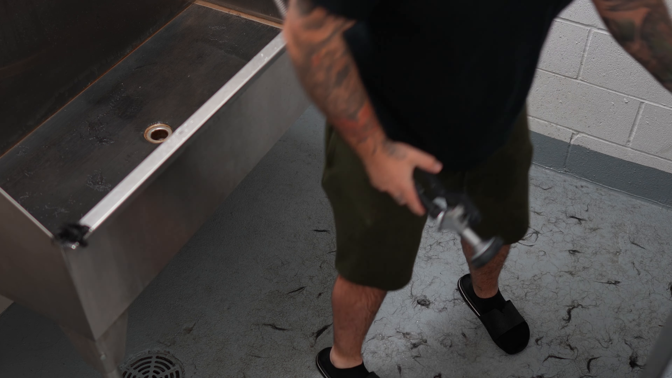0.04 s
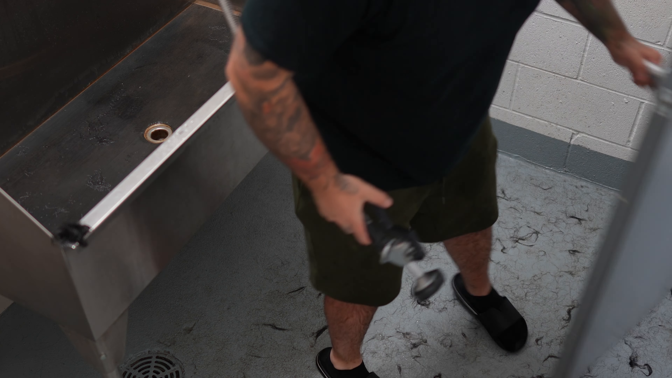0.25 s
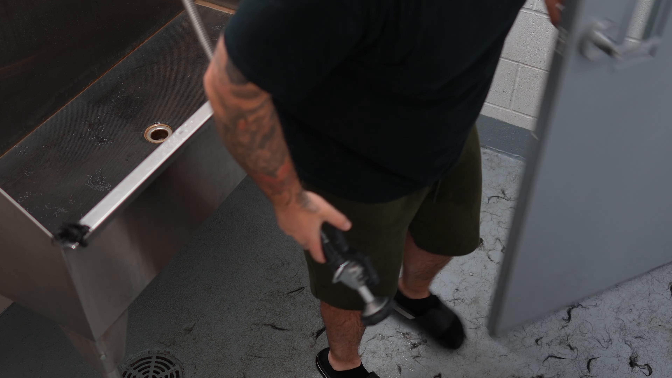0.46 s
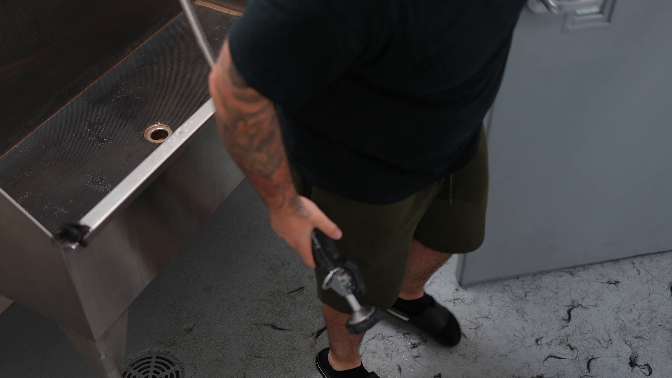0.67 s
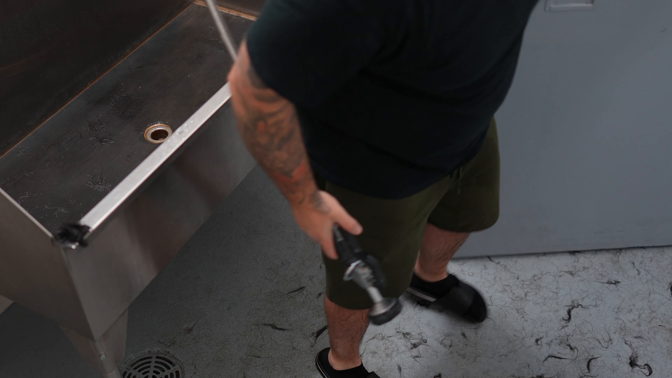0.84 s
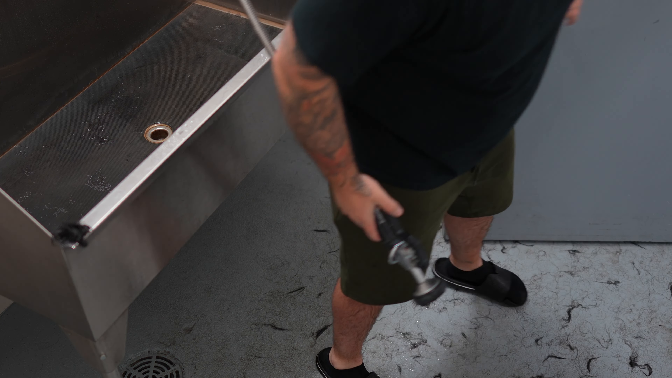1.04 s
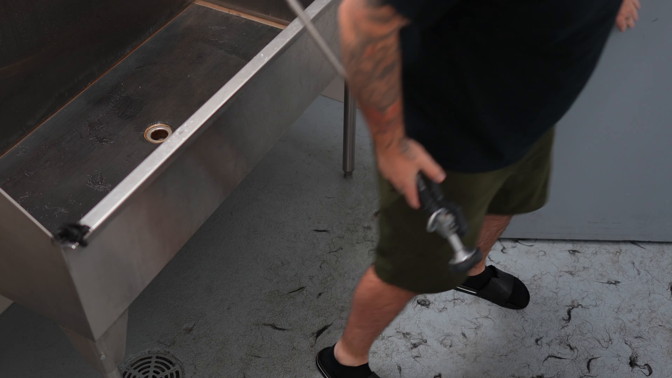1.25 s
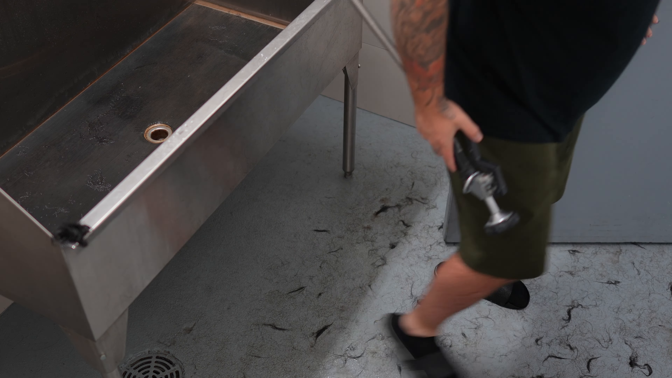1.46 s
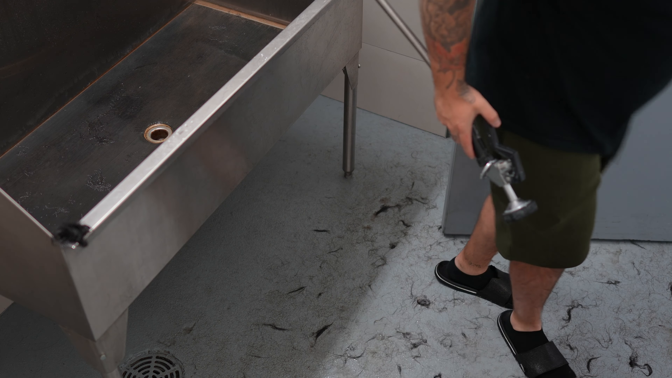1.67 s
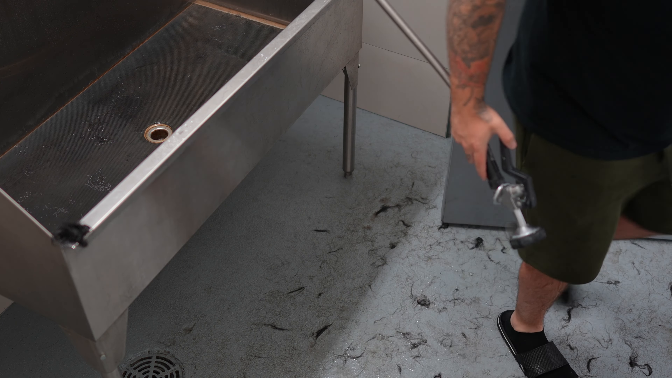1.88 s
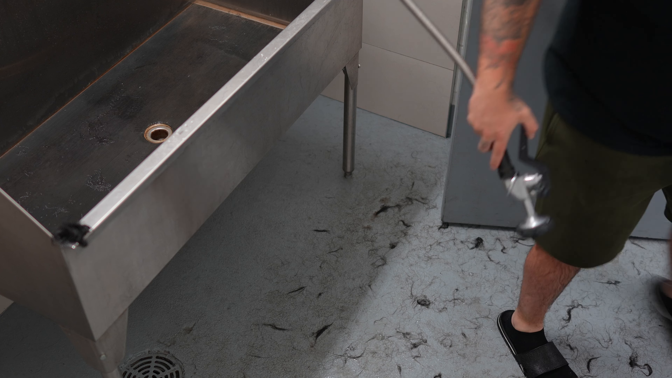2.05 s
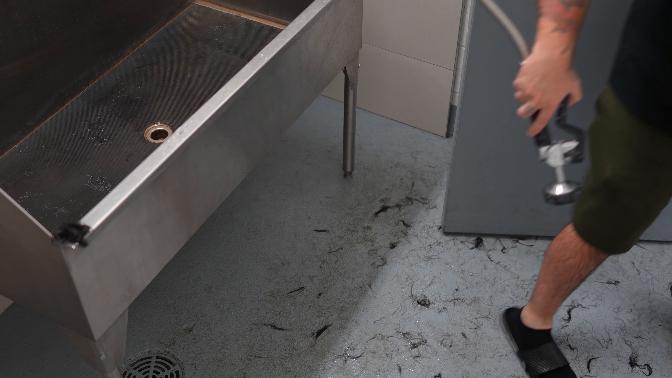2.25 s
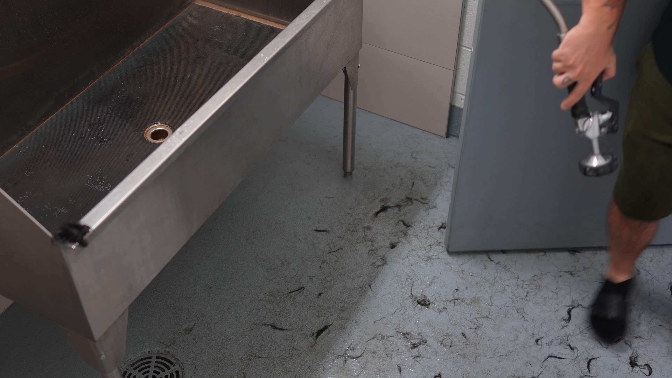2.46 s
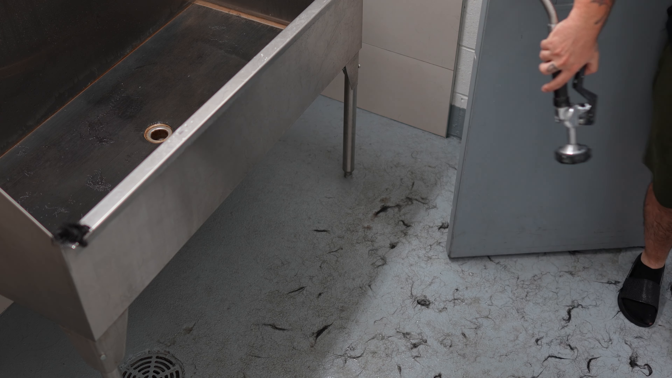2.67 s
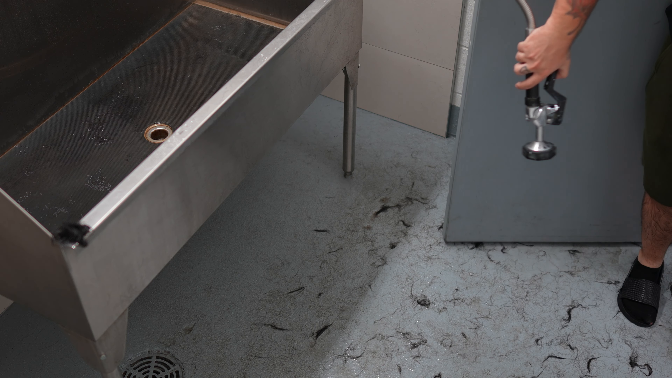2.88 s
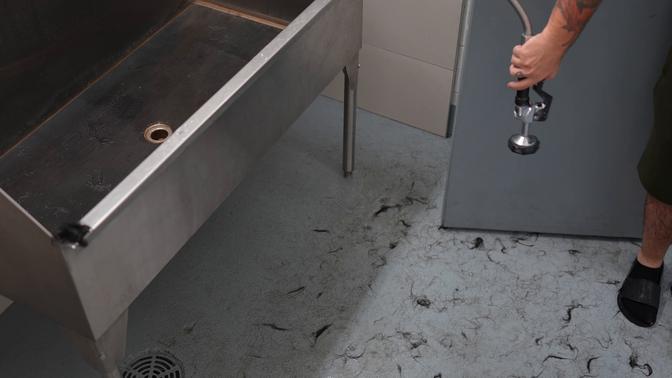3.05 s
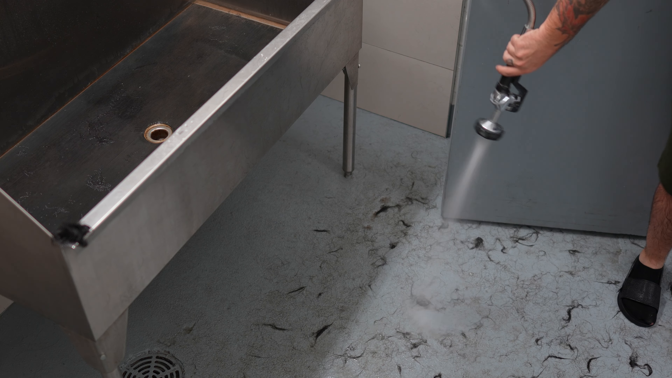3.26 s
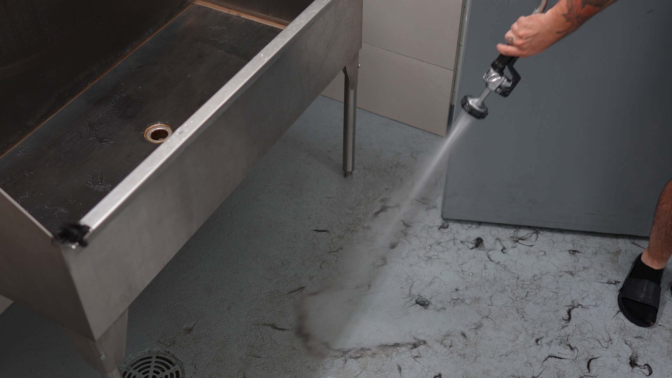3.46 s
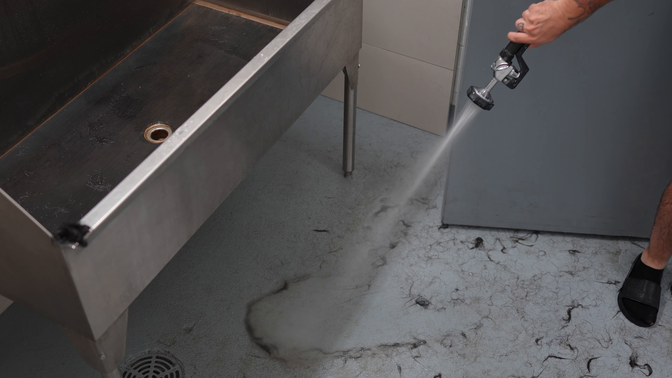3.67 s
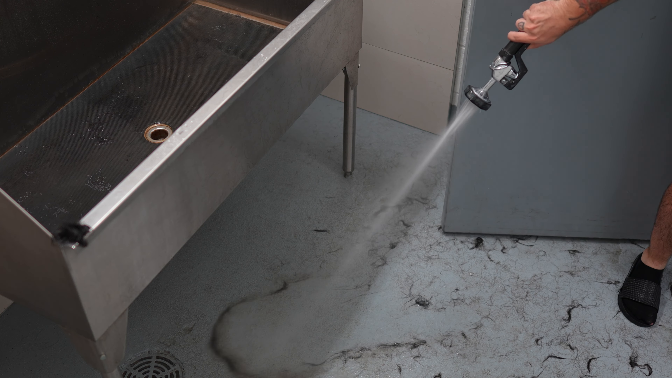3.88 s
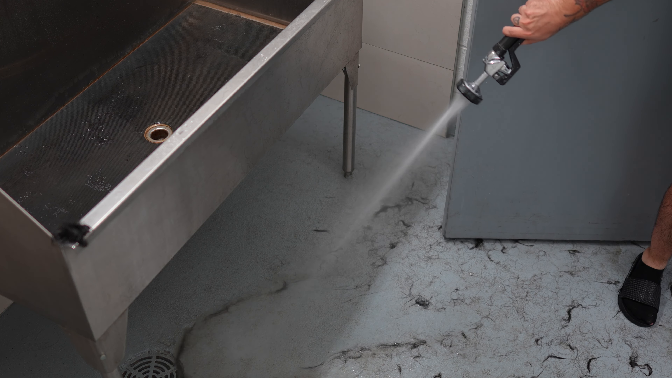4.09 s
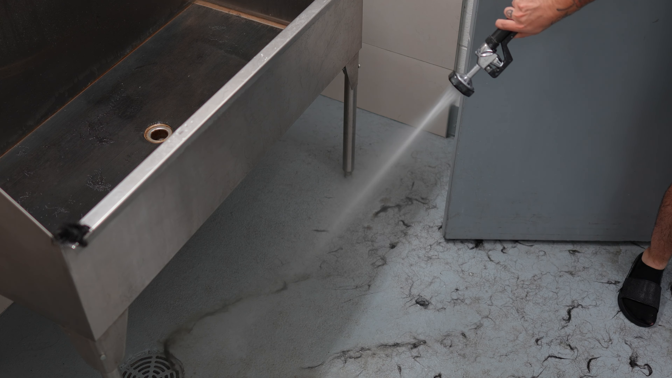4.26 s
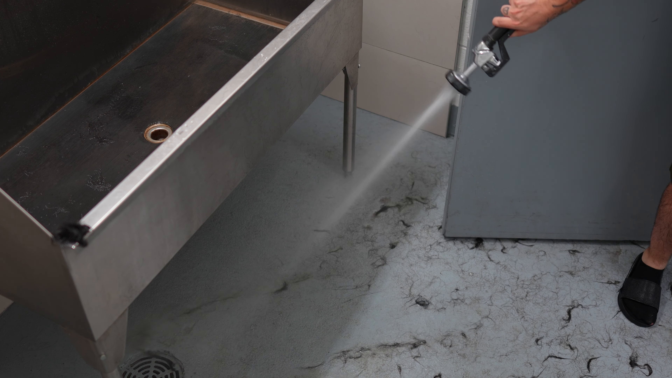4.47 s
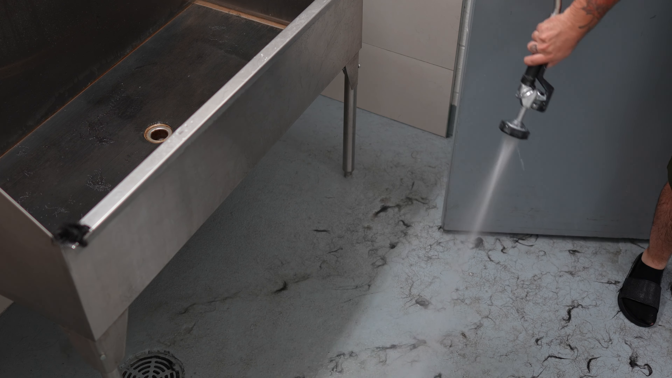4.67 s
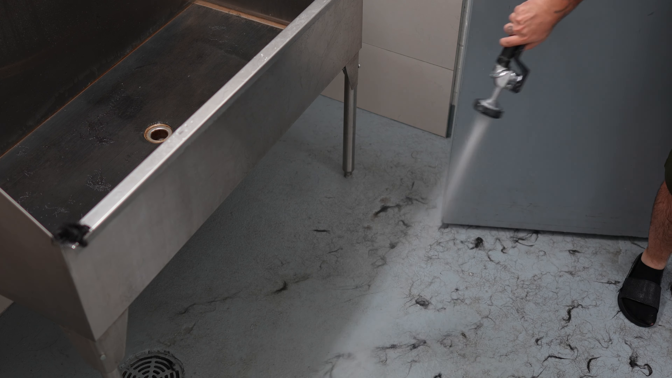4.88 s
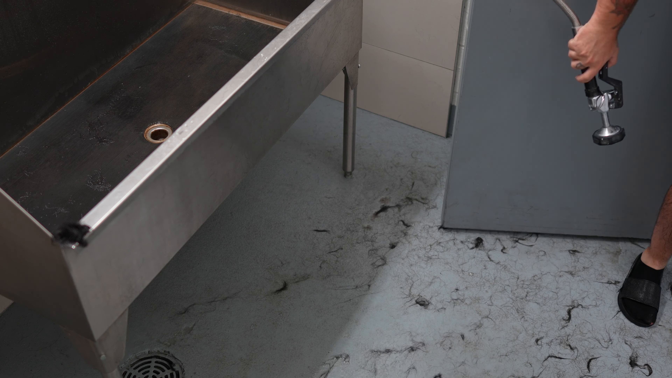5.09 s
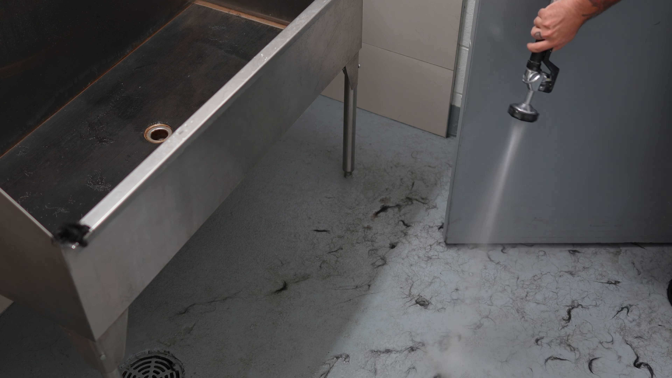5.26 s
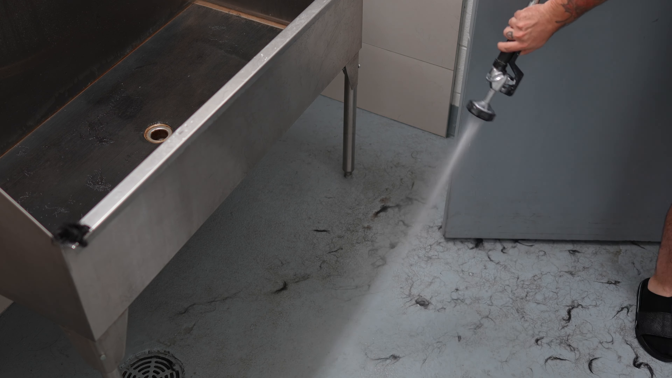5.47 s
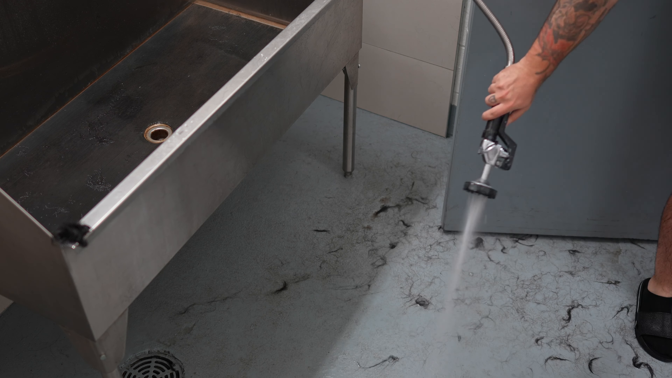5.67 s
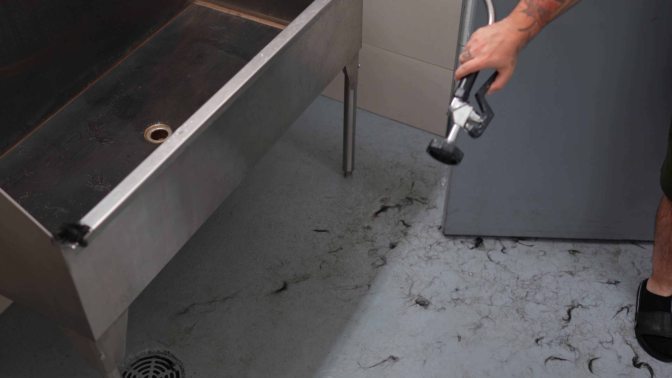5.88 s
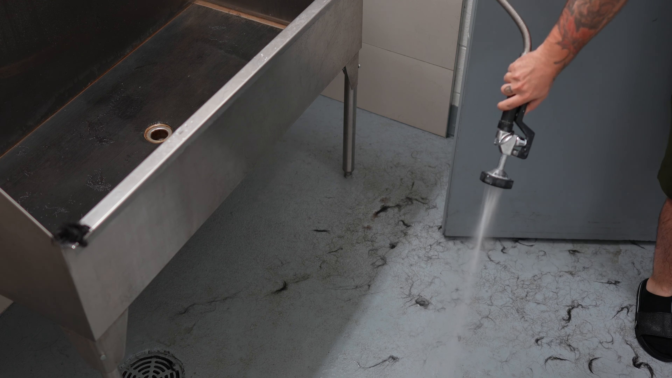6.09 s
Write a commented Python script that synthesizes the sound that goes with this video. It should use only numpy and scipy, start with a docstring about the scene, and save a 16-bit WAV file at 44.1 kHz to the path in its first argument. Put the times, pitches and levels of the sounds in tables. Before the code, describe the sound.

Sandals scuff and click across a gritty floor over a faint fan hum, then a hose sprayer sputters, blasts, stops and restarts.

```python
"""A squeezed hose sprayer in a hard-walled wash room: shaped droplet noise hisses as jet, floor splash and fine mist.
Trapped air first makes it sputter and whistle; the jet stops and restarts twice.
Before it someone shuffles a few steps in sandals on a gritty floor: noise scrapes and crackles, with short
clicks, knocks of ringing modes and faint gliding squeaks. A fan of steady noise and wavering hum tones drones throughout."""
import sys
import numpy as np
from scipy import signal
from scipy.fft import rfft, irfft, next_fast_len
from scipy.io import wavfile
from scipy.ndimage import uniform_filter1d, map_coordinates

SR = 44100
rng = np.random.default_rng(int(sys.argv[2]) if len(sys.argv) > 2 else 0)


def field_ratio(decibels):
    """Amplitude ratio for a level in dB (20 dB per decade); scalars and array-likes work."""
    return 10 ** (np.asarray(decibels, dtype=float) / 20)


def wav_out(sig):
    """Save sig, one row per channel (or a flat mono array), as 16-bit PCM at SR to the path in sys.argv[1]."""
    wavfile.write(sys.argv[1], SR, np.round(np.clip(np.atleast_2d(sig).T, -1, 1) * 32767).astype(np.int16))


N = 270333

# squeezes of the trigger: valve starts to open [start_s], [opening_s], valve starts to shut [shut_s],
# fall of the jet [fade_db_per_s]
SQUEEZES = [(3.205, 0.062, 4.96, 237), (5.196, 0.034, 5.838, 450), (6.044, 0.046, 6.13, 400)]
FLIGHT_S = 0.016  # the splash starts this long after the jet


def unit(x):
    """Scaled to rms 1."""
    return x / np.sqrt(np.mean(x ** 2) + 1e-20)


def along(points, hz):
    """(Hz, value) points read on a log frequency axis."""
    f, v = np.transpose(points)
    return np.interp(np.log(hz + 1), np.log(f + 1), v)


def curves(rows):
    """One value per sample for each column after the time; -120 outside the table."""
    s, *cols = np.transpose(rows)
    return [np.interp(np.arange(N) / SR, s, c, left=-120, right=-120) for c in cols]


def wobble(rate):
    """A smooth random curve, rate knots a second."""
    knots = rng.standard_normal(int(N * rate / SR) + 4)
    return map_coordinates(knots, [np.arange(N) * rate / SR])


def filtered(x, response):
    """x shaped by a complex response of frequency."""
    m = next_fast_len(N + 8192)
    return irfft(rfft(x, m) * response(np.fft.rfftfreq(m, 1 / SR)), m)[:N]


def coloured(x, spectrum):
    """x shaped by (Hz, dB) points, at rms 1."""
    return unit(filtered(x, lambda hz: field_ratio(along(spectrum, hz))))


def droplets(share, spread_db):
    """Noise mixed with sparse impacts of uneven but bounded size; share is the power of the impacts."""
    size = np.minimum(rng.exponential(size=N), 3)
    hits = (rng.random(N) < 0.05) * field_ratio(spread_db * size) * rng.standard_normal(N)
    share = np.clip(share, 0, 1)
    return np.sqrt(1 - share) * rng.standard_normal(N) + np.sqrt(share) * unit(hits)


def patchy(x, depth_db):
    """Random gain patches some 500 Hz by 60 ms."""
    z = signal.stft(x, nperseg=512)[2]
    field = uniform_filter1d(rng.standard_normal(z.shape), size=6, axis=0)
    field = uniform_filter1d(field, size=10, axis=1)
    return signal.istft(z * field_ratio(depth_db * unit(field)), nperseg=512)[1][:N]


def band(length, hz, width):
    """Noise of rms 1 through one resonance, applied twice."""
    b, a = signal.iirpeak(hz, hz / width, SR)
    noise = rng.standard_normal(length + 500)
    ringing = signal.lfilter(b, a, signal.lfilter(b, a, noise))
    return unit(ringing[500:])  # skip the build-up


def hoarse(events):
    """Swells of narrow noise: each fades in and out around its pitch."""
    out = np.zeros(N)
    for s, length, hz, width, db in events:
        u = np.linspace(0, np.pi, round(length * SR))
        swell = np.sqrt(np.abs(np.sin(u)))
        out[round(s * SR):][:len(u)] += field_ratio(db) * swell * band(len(u), hz, width)
    return out


def snaps(events, modes, t60, broad_db):
    """Short bursts: a broad snap, a noisy resonance and a tone at the centre, and the fixed modes of the struck part."""
    out, t = np.zeros(N + SR), np.arange(SR // 10) / SR
    onset = 1 - np.exp(-t / 0.0004)
    for s, db, hz in events:
        burst = field_ratio(broad_db) * np.diff(rng.standard_normal(len(t) + 1))
        burst += field_ratio(-4.0) * band(len(t), hz, hz)
        burst += 0.64 * np.sin(2 * np.pi * hz * t)
        for mode_hz, level in modes:
            phase = rng.uniform(0, 2 * np.pi)
            burst += field_ratio(level + rng.normal(0, 2)) * np.sin(2 * np.pi * mode_hz * t + phase)
        out[round(s * SR):][:len(t)] += field_ratio(db - 5.5 - 60 * t / t60) * onset * burst
    return out[:N]


def stroke(start, attack, hold, fade_db_per_s, from_db=-30):
    """Level in dB: rises to 0 over the attack, holds, then fades steadily."""
    t = np.arange(N) / SR - start
    rise = np.where(t < 0, -200, from_db * (1 - np.clip(t / attack, 0, 1)) ** 2)
    return rise - fade_db_per_s * np.clip(t - attack - hold, 0, None)


def fan():
    """Fan and air: nearly steady shaped noise, louder for a moment at first, over a low rumble that grows late."""
    # spectrum of fan and air: [pitch_hz], relative density [level_db]
    drone = [(20, -47), (70, -36.5), (100, -33), (125, -12), (160, -6.5), (205, -2.5), (255, 4.5), (275, 0),
             (296, 5.5), (330, -6.5), (400, -7), (620, -8), (720, -11.5), (2800, -24), (7000, -40.5),
             (15500, -55)]
    # spectrum of the rumble: [pitch_hz], relative density [level_db]
    rumble = [(50, -34), (75, -12), (100, 6), (130, 1), (160, -39)]
    t = np.arange(N) / SR
    start_db, settles_s = 5, 0.08
    fan_db = -40.5 + start_db * np.exp(-t / settles_s) + 0.22 * wobble(2.32)
    rumble_db = np.where(t > 4.66, -64, -74)
    noise = field_ratio(fan_db) * coloured(patchy(rng.standard_normal(N), depth_db=0.06), drone)
    return noise + field_ratio(rumble_db) * coloured(rng.standard_normal(N), rumble)


def hum():
    """Mains and motor tones as sines of drifting level and phase; late the mains tone weakens and the strongest wavers."""
    # the strongest tone: [time_s], [pitch_hz], rms [level_db]
    whine = [(0, 475, -43), (.74, 473.6, -44.5), (.82, 477, -80), (1.2, 472, -53), (1.35, 477.7, -49.5),
             (2.4, 481, -49.5), (3.2, 481.8, -50), (4.3, 478.4, -45.5), (4.66, 484, -48.5),
             (4.85, 488, -50), (5.1, 483.4, -47.5), (5.35, 480.4, -43.5), (5.55, 484, -47),
             (5.8, 484, -52.5), (6.13, 476, -47)]
    # level of the upper tone: [time_s], rms [level_db]
    upper_tone = [(0, -64), (2, -60), (2.15, -54), (3.05, -53.5), (3.2, -60), (4.6, -57), (6.13, -62)]
    # weak tones: [pitch_hz], rms [level_db] before the wobble
    weak_tones = [(357, -59.5), (425, -61), (522, -59.5)]
    t = np.arange(N) / SR
    late = t > 4.66
    whine_hz, whine_db = curves(whine)
    whine_phase = 2 * np.pi * np.cumsum(whine_hz) / SR + (0.24 + 1.44 * late) * wobble(12)
    tones = field_ratio(whine_db + 0.7 * wobble(5)) * np.sin(whine_phase)
    tones += field_ratio(np.where(late, -59, -56)) * np.sin(2 * np.pi * 119.8 * t)  # mains
    upper_db = curves(upper_tone)[0] + 0.53 * wobble(4.36)
    tones += field_ratio(upper_db) * np.sin(2 * np.pi * 623 * t + 0.28 * wobble(4.25))
    for hz, db in weak_tones:
        tones += field_ratio(db + 2.9 * wobble(5.8)) * np.sin(2 * np.pi * hz * t + 1.7 * wobble(4.01))
    return np.sqrt(2) * tones  # peak to rms


def scuffs():
    """Grit slips in clumps under the sole; the crackle dies faster than the scrape."""
    # drags of a sole over grit: [start_s], scrape [level_db], crackle over scrape [over_db], [hold_s]
    drags = [(.01, -46, -2.5, 0.031), (.12, -58.5, -0.5, .17), (0.304, -52, -12, 0.018), (.34, -61, -6, .1),
             (0.46, -54, -13, 0.049), (0.577, -53, -5.5, 0.0098), (1.02, -64, -18, .08),
             (1.153, -52, -3, 0.071), (1.289, -44, -2, 0.0082), (1.337, -44.5, -0.5, 0.02),
             (1.62, -63, -2, .04), (1.675, -48, -4, .02), (1.71, -44, 0, .01), (1.8, -43, -4, 0.028),
             (2.14, -55.5, -13, .02), (2.191, -41, -6.5, 0.034), (2.276, -46.5, -0.5, .015),
             (2.3, -47, -1.5, 0.018), (2.591, -56.5, -6, .02), (2.62, -49.5, -3.5, 0.011),
             (3.07, -58, -12, 0.057), (3.178, -56, -2, .03)]
    # a dragged sole rings hoarsely: [start_s], [length_s], [pitch_hz], [width_hz], [level_db]
    rubs = [(.3, .07, 2680, 400, -55), (.47, 0.045, 5100, 400, -64), (1.295, .08, 3030, 250, -48),
            (1.325, 0.028, 3800, 700, -47), (1.335, 0.071, 8300, 350, -54), (1.335, 0.044, 10300, 500, -51),
            (1.73, 0.075, 4700, 1000, -50), (1.82, 0.12, 1590, 900, -45.5), (1.82, .08, 6140, 1200, -50),
            (1.83, .07, 11500, 900, -63), (2.2, 0.11, 1310, 300, -49), (2.215, 0.029, 7310, 600, -48),
            (2.3, 0.033, 5250, 1500, -47), (2.62, 0.055, 4000, 2500, -52)]
    # spectra of scrape and crackle: [pitch_hz], relative density [level_db]
    scrape_colour = [(400, -9), (1000, 2.5), (2000, 1.5), (4000, -3), (7000, -10.5), (12000, -44)]
    crackle_colour = [(3000, -7), (6000, 0), (9000, -1.5), (12000, -7.5), (16000, -23)]
    attack_s, scrape_fade_db_per_s, crackle_fade_db_per_s = 0.0063, 74, 116
    scrape_power = field_ratio(2 * -63)  # soles still shift faintly between drags
    crackle_power = field_ratio(2 * -86)
    for s, db, over, hold in drags:
        scrape_power = scrape_power + field_ratio(2 * (db + stroke(s, attack_s, hold, scrape_fade_db_per_s)))
        crackle_power = crackle_power + field_ratio(2 * (db + over + stroke(s, attack_s, hold, crackle_fade_db_per_s)))
    scrape = coloured(patchy(droplets(share=0.25, spread_db=4.5), depth_db=1.0), scrape_colour)
    crackle = coloured(patchy(droplets(share=0.58, spread_db=3), depth_db=2.5), crackle_colour)
    drag = np.sqrt(scrape_power) * scrape + np.sqrt(crackle_power) * crackle
    moving = np.arange(N) / SR < 3.6  # then the feet are still
    clumps_db = 0.92 * wobble(59.44)
    return field_ratio(clumps_db) * (moving * drag + hoarse(rubs))


def clicks():
    """Soles and grit click: short noisy bursts, each around its own centre pitch."""
    # clicks: [start_s], [level_db], centre [pitch_hz]
    click_events = [(0.0144, -43, 5910), (0.0444, -35, 5810), (0.1044, -31, 5180), (0.3057, -38, 3030),
                    (0.4723, -43, 7000), (0.5821, -34.5, 6450), (1.1583, -31, 3480), (1.1894, -37, 4130),
                    (1.2938, -20.5, 3060), (1.3014, -35, 3000), (1.3087, -32, 3030), (1.3344, -22, 3770),
                    (1.6853, -34, 3210), (1.7212, -26, 4605), (1.7584, -30, 4420), (1.8177, -22, 5894),
                    (2.1899, -28, 2490), (2.2218, -27, 3030), (2.2802, -24, 9100), (2.2035, -32, 8000),
                    (2.303, -28, 8500), (2.6294, -42, 3830)]
    return snaps(click_events, [], t60=0.019, broad_db=-16)


def squeaks():
    """Thin faint glides, roughened by a random jitter of the pitch."""
    # squeaks: [start_s], [length_s], [start_hz], [end_hz], [level_db]
    glides = [(.97, .14, 10900, 11500, -82), (2.92, 0.15, 9800, 9800, -84)]
    out = np.zeros(N)
    for s, length, hz0, hz1, db in glides:
        u = np.linspace(0, 1, round(length * SR))
        hz = hz0 + (hz1 - hz0) * np.sqrt(u) + 1200 * rng.standard_normal(len(u))
        swell = 2 * np.sqrt(np.sin(np.pi * u).clip(0))
        out[round(s * SR):][:len(u)] += field_ratio(db) * swell * np.sin(2 * np.pi * np.cumsum(hz) / SR)
    return out


def knocks():
    """Dull knocks ring a few damped low modes over a noisy puff."""
    # knocks of a heel and of the closing valve: [start_s], [level_db], [t60_s]
    knock_events = [(2.188, -37.5, 0.15), (5.83, -27, 0.098)]
    # modes of a knock: [pitch_hz], relative [level_db]
    knock_modes = [(165, 4), (260, 2), (748, 1), (830, -1), (1300, -10)]
    out, t = np.zeros(N + SR), np.arange(SR // 5) / SR
    onset = 1 - np.exp(-t / 0.0088)
    for s, db, t60 in knock_events:
        ring = sum(field_ratio(level) * np.sin(2 * np.pi * hz * t) for hz, level in knock_modes)
        puff = field_ratio(0.5) * band(len(t), 1080, 1400)
        out[round(s * SR):][:len(t)] += field_ratio(db - 60 * t / t60) * onset * (ring + puff)
    return out[:N]


def valve(lag_s, faster=1):
    """Gain of the opening and shutting valve; a lag delays the start, faster speeds up the fall."""
    gain = np.zeros(N)
    for s, opening, shut, fall in SQUEEZES:
        start = s + lag_s
        gain += field_ratio(stroke(start, opening, shut - start - opening, faster * fall, from_db=-31))
    return gain


def jet_force():
    """Steady force of the jet and its brief surges and dips, both in dB."""
    # force while the valve is open, sagging with the hose pressure: [time_s], jet hiss [level_db]
    pressure = [(3.2, -28), (3.29, -24), (3.42, -24), (3.55, -24.5), (3.62, -28), (3.75, -29.5),
                (3.92, -33), (4.3, -34), (4.7, -36), (4.96, -35.5), (5.2, -34), (5.3, -33), (5.5, -34.5),
                (5.7, -36.5), (5.82, -38), (6.05, -39), (6.13, -38)]
    # brief surges or dips: [time_s], over the steady force [surge_db], [half_width_s]
    surges = [(3.372, -1, .03), (3.428, 1.5, .02), (3.73, 0, .03), (4.682, -4, 0.015), (4.705, 4, 0.022),
              (4.826, 6, 0.042), (4.95, 1.5, .02), (5.31, 3, .015), (5.345, 3.5, .015), (5.438, 4, 0.026),
              (5.598, 5.5, 0.014), (5.67, 2.5, .03), (5.828, 4.5, 0.017)]
    t = np.arange(N) / SR
    surge_db = sum(db * np.exp(-((t - s) / width) ** 2) for s, db, width in surges)
    return curves(pressure)[0], surge_db


def dribbles():
    """Gains of jet hiss and floor splash for dribbles around a nearly shut valve."""
    # dribbles: [start_s], jet hiss [level_db], floor splash [level_db]
    dribble_events = [(5.03, -46, -54), (5.165, -59, -44)]
    drips = [field_ratio(stroke(s, 0.0061, 0, fade_db_per_s=352)) for s, _, _ in dribble_events]
    return field_ratio(np.transpose(dribble_events)[1:]) @ drips


def jet(force_db, surge_db, drips):
    """Water hisses out of the nozzle as droplet noise that follows force and surges in full."""
    # spectrum of the jet: [pitch_hz], relative density [level_db]
    jet_colour = [(2500, -21.5), (4000, -9.5), (5500, -3.5), (7000, -1.5), (8500, -2.5), (10500, -5),
                  (13000, -11.5), (16000, -9.5)]
    hiss = coloured(patchy(droplets(share=0.14, spread_db=4.5), depth_db=0.56), jet_colour)
    return (field_ratio(force_db + surge_db) * valve(0) + drips) * hiss


def mist(over_usual_db, drips):
    """Fine mist: bright droplet noise that starts just after the jet and falls a little faster."""
    # spectrum of the mist: [pitch_hz], relative density [level_db]
    mist_colour = [(5000, -42), (9000, 9.5), (12000, 10.5), (14000, 8), (15300, 4), (16000, -10)]
    gain = field_ratio(-38 + 0.84 * over_usual_db) * valve(lag_s=0.01, faster=1.1) + field_ratio(-13) * drips
    return gain * coloured(patchy(droplets(share=0.2, spread_db=4.0), depth_db=1.0), mist_colour)


def splash(over_usual_db, surge_db, drips):
    """Drops patter on the floor; they sound thinner until a film of water has built up."""
    # spectrum of the splash: [pitch_hz], relative density [level_db]
    splash_colour = [(300, -11), (700, -1.5), (1500, -3), (3000, -0.5), (5000, -1), (9000, -7),
                     (16000, -32)]
    wetting_s = (0.3, 0.07, 0.05)  # time to build the film, squeeze by squeeze
    t = np.arange(N) / SR
    gain = field_ratio(-35.5 + 0.52 * over_usual_db + 0.18 * surge_db) * valve(FLIGHT_S, faster=0.87) + drips
    patter = coloured(patchy(droplets(share=0.27, spread_db=1.0), depth_db=0.46), splash_colour)
    dryness = [np.exp(-np.abs(t - s - FLIGHT_S) / wet) for (s, *_), wet in zip(SQUEEZES, wetting_s)]
    body = filtered(patter, lambda hz: 1 / (1 + (hz / 1500) ** 4))
    return gain * (patter - 0.64 * np.max(dryness, axis=0) * body)


def spits():
    """Single slugs of water snap and ring the nozzle as the valve opens or shuts."""
    # slugs: [start_s], [level_db], centre [pitch_hz]
    slugs = [(3.2231, -14.5, 10680), (3.235, -15, 8720), (3.243, -11, 6310), (3.249, -10, 6700),
             (3.26, -14, 6510), (3.2674, -20.5, 6950), (3.2776, -7, 6400), (3.2829, -5.5, 6500),
             (3.2994, -9, 7850), (3.4184, -6, 8000), (3.5194, -10, 8050), (5.035, -20, 6330),
             (5.0774, -30, 11000), (5.2108, -27, 7400)]
    # modes of the nozzle: [pitch_hz], relative [level_db]
    nozzle_modes = [(6450, -9), (7700, -11), (10500, -9), (14000, -11)]
    return snaps(slugs, nozzle_modes, t60=0.014, broad_db=-18)


def whistles():
    """The nozzle whistles hoarsely while air leaves it: swells of narrow noise."""
    # whistles: [start_s], [length_s], [pitch_hz], [width_hz], [level_db]
    whistle_events = [(3.25, 0.12, 6340, 900, -29.5), (3.27, 0.068, 7900, 600, -34),
                      (3.397, 0.085, 8070, 450, -26.5), (3.499, 0.071, 8200, 600, -30),
                      (3.56, 0.12, 6700, 600, -44), (5.164, 0.031, 6470, 2500, -46)]
    return hoarse(whistle_events)


def spray():
    """Jet, mist, whistles, splash and spits; trapped air makes the first rush sputter by a fast random gain."""
    t = np.arange(N) / SR
    force_db, surge_db = jet_force()
    over_usual_db = force_db + 34  # usual jet force is -34 dB
    jet_drips, floor_drips = dribbles()
    air = np.exp(-np.abs(t - 3.25) / 0.085)
    sputter_db = (0.25 + 1.4 * air) * wobble(130) + 0.22 * wobble(13)
    at_nozzle = jet(force_db, surge_db, jet_drips) + mist(over_usual_db, jet_drips) + whistles()
    on_floor = splash(over_usual_db, surge_db, floor_drips)
    return field_ratio(sputter_db) * at_nozzle + field_ratio(0.76 * sputter_db) * on_floor + spits()


def room(x):
    """The hard walls answer with a noise tail; each frequency dies at its own speed."""
    # decay of the room: [pitch_hz], [t60_s]
    decay = [(300, 0.26), (2000, 0.63), (6000, 0.86), (14000, 0.25)]
    hz, t, z = signal.stft(rng.standard_normal(SR), SR, nperseg=256)
    tail = signal.istft(z * field_ratio(-60 * t / along(decay, hz)[:, None]), SR, nperseg=256)[1]
    delayed = np.pad(x, (200, 0))  # samples before the first answer
    return signal.fftconvolve(delayed, tail / np.linalg.norm(tail))[:N]


def low_cut(hz):
    """Small near sources give off almost no deep bass: a steep fall below 130 Hz."""
    return (1j * hz / (130 + 1j * hz)) ** 4


def scene():
    """One microphone feeds both channels; the walls return little of the spray's treble."""
    drone = fan() + hum()
    feet = scuffs() + clicks() + squeaks() + knocks()
    water = spray()
    dull_water = filtered(water, lambda hz: 1 / (1 + 1j * hz / 4000) ** 2)
    near = feet + water + room(field_ratio(-10) * feet + field_ratio(-13.5) * dull_water)
    mono = filtered(near, low_cut) + drone
    return np.array([mono, mono])


def roll_off(x):
    """The treble ends steeply here."""
    return signal.sosfilt(signal.butter(12, 16490, fs=SR, output="sos"), x)


def record(dry):
    """Band-limits the mix: the treble fades out over the last 250 Hz below the top."""
    top_hz = 15950
    kept = filtered(dry[0], lambda hz: np.clip((top_hz - hz) / 250, 0, 1))
    return roll_off(np.array([kept, kept]))


dry = scene()
out = record(dry)
wav_out(out)
```